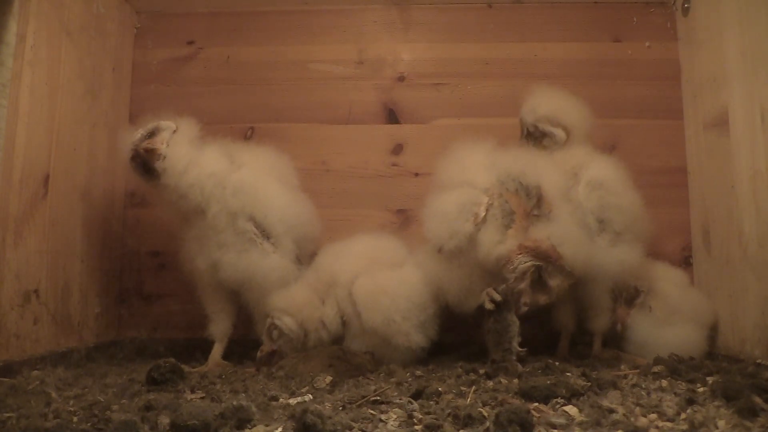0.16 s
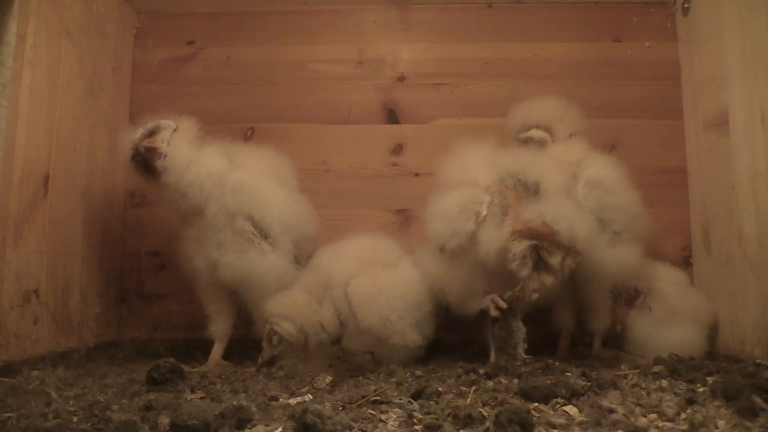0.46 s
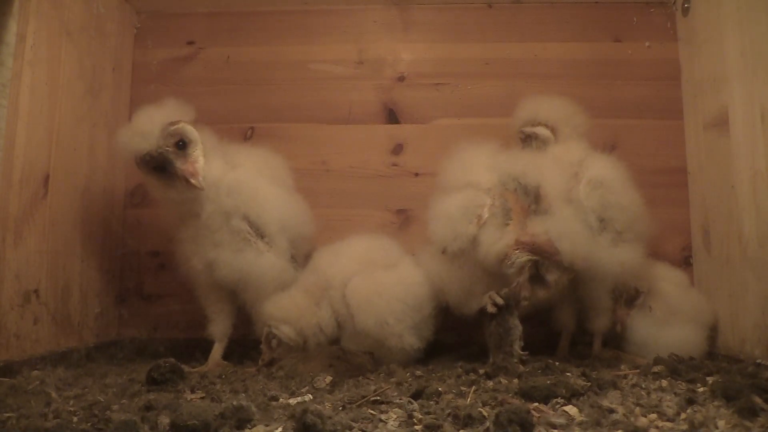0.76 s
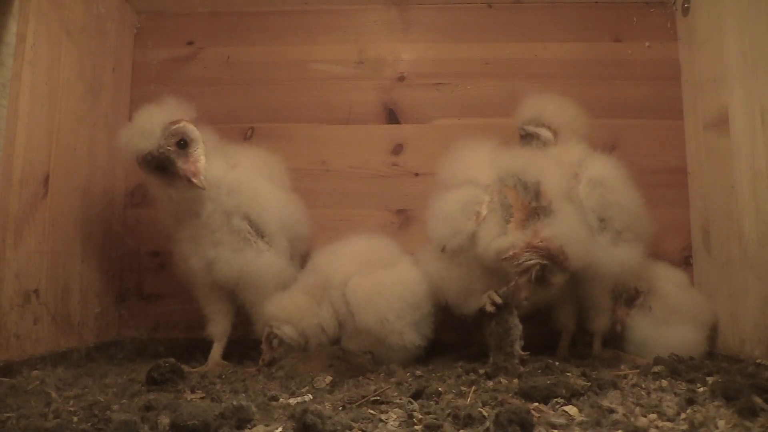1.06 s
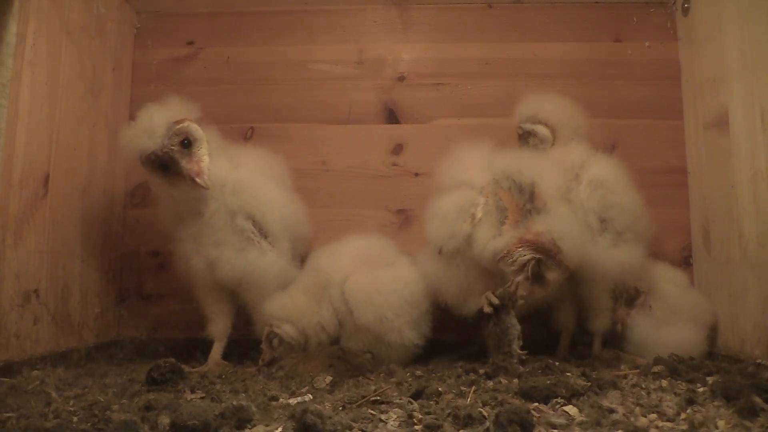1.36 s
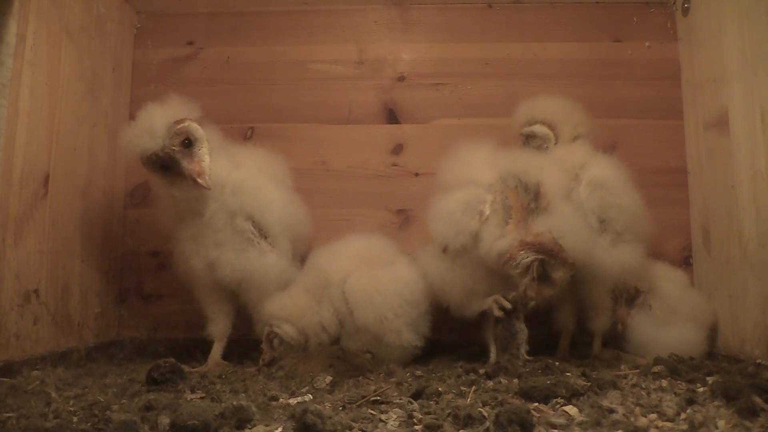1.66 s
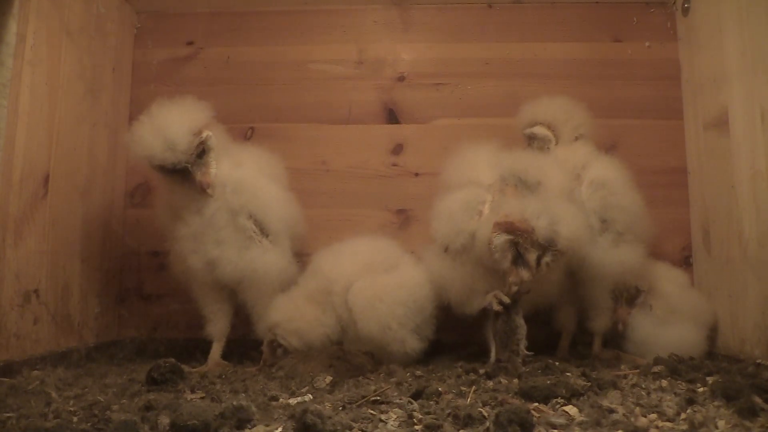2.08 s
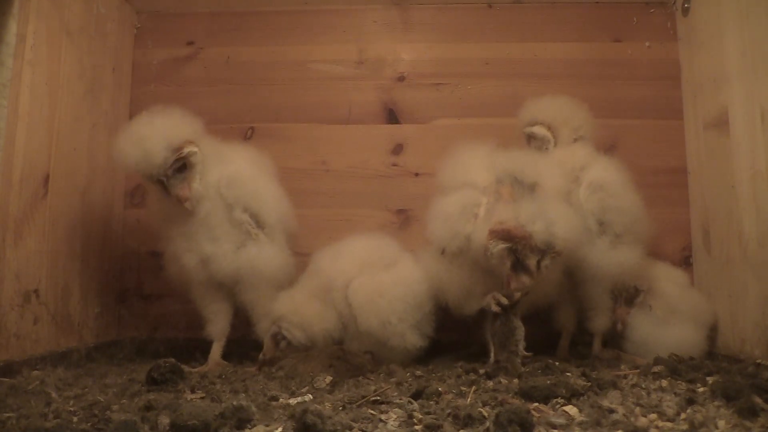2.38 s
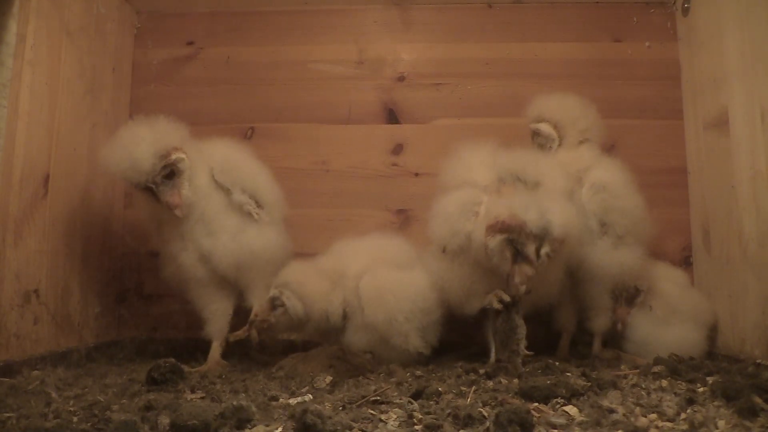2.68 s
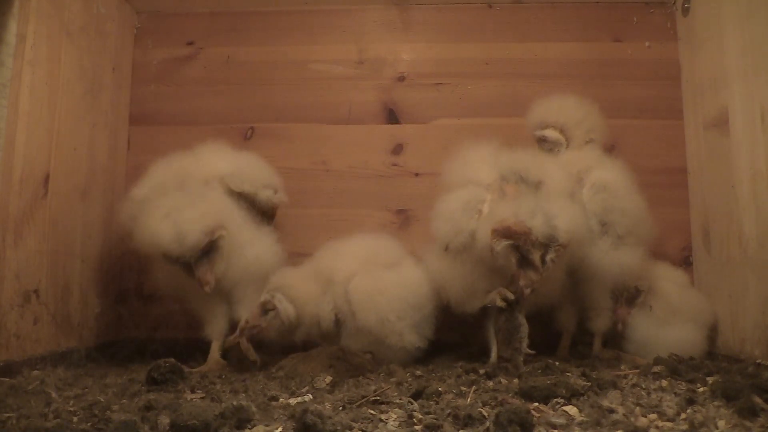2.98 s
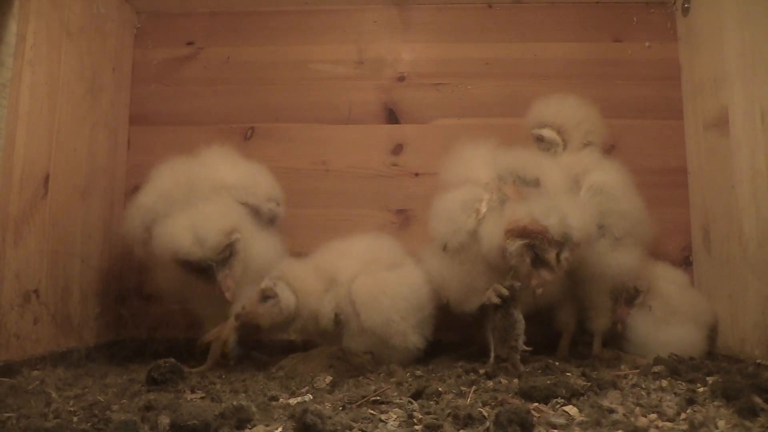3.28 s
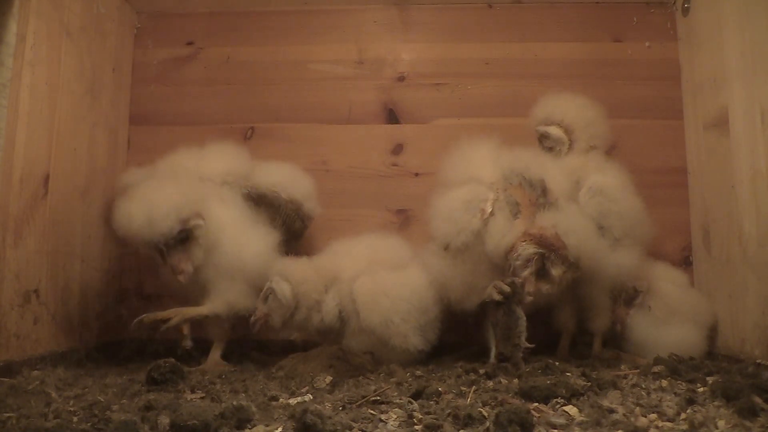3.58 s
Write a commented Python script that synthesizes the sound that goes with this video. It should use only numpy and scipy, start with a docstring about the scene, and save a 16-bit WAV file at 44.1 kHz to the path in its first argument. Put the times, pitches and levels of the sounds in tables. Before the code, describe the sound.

A young owl's harsh, raspy hiss, bright and rapidly fluttering, is under way at 0 s, shifts in tone around 0.35 s as the beak closes, and fades by 0.5 s with a tiny boxy echo. A steady, dull outdoor drone continues under thin mains buzz and faint electronic hiss. Soft, low foot thumps on boards come near 0.1, 0.35 and 0.7 s, several between 1.85 and 2.85 s, and one at 3.7 s.

```python
"""Owl chick in a nest box

An owl chick ends a raspy hiss inside a wooden nest box: chopped air drives throat and beak resonances.
A steady outdoor drone, noise shaped by the box modes, surrounds it, and feet thump the floor
boards softly as decaying low sines. Alternating mains spikes and electronic hiss join the microphone signal."""
import sys
import numpy as np
from scipy import signal
from scipy.io import wavfile
from scipy.ndimage import uniform_filter1d

SR = 44100
rng = np.random.default_rng(int(sys.argv[2]) if len(sys.argv) > 2 else 0)


def decibels_to_gain(level_db):
    """Convert a level in decibels to a linear amplitude gain (20 dB per decade)."""
    exponent = np.asarray(level_db, float) / 20
    return 10 ** exponent


def pcm_store(signal):
    """Save signal as 16-bit PCM."""
    levels = np.round(np.clip(np.atleast_2d(signal), -1, 1) * 32767)
    wavfile.write(sys.argv[1], SR, levels.astype(np.int16).T)


N = 164934  # samples
# Short-time spectra: 4096-sample windows every 1024 samples
FRAMES, BINS_HZ = N // 1024 + 5, np.fft.rfftfreq(4096, 1 / SR)


def evened(x):
    """Normalization: scales a signal to rms 1."""
    return x / np.sqrt(np.mean(x ** 2) + 1e-20)


def spectrum_at(points, hz):
    """Spectral envelope: interpolates levels in dB along a log-frequency axis."""
    point_hz, point_db = np.transpose(points)
    return np.interp(np.log(hz + 1), np.log(point_hz + 1), point_db)


def drift(count, seconds):
    """Slow random modulation: white noise through two moving averages of this length, at rms 1."""
    size = max(round(seconds * SR), 1)
    once = uniform_filter1d(rng.standard_normal(count), size)
    return evened(uniform_filter1d(once, size))


def resonate(x, hz, width):
    """Heterodyned resonance: shifts hz to zero, low-passes with one pole, shifts back, at unit peak gain."""
    carrier = np.exp(2j * np.pi * np.cumsum(hz * np.ones(len(x))) / SR)
    pole = np.exp(-np.pi * width / SR)
    return 2 * (carrier * signal.lfilter([1 - pole], [1, -pole], x / carrier)).real


def noise(shape_db):
    """Spectral shaping: weights random short-time spectra by a bins x frames field, at rms 1."""
    real, imaginary = rng.standard_normal((2,) + shape_db.shape)
    spectra = (real + 1j * imaginary) * decibels_to_gain(shape_db)
    return evened(signal.istft(spectra, nperseg=4096, noverlap=3072)[1][:N])


def chick():
    """Source-filter voice: flaps of the syrinx chop the air, and the closing beak tips its resonances."""
    # The call over time. Each row: time in seconds, then levels in dB of the low throat group,
    # the main group and the upper group.
    breath = [(0, -51, -53, -54.5), (.08, -50.5, -54, -53), (.122, -46, -48.5, -52),
              (.17, -50.5, -50.5, -50.5), (.215, -59, -44, -51), (.29, -47, -53, -51.5),
              (.35, -49.5, -45.5, -48.5), (.386, -43.5, -49.5, -48), (.40, -47.5, -49, -57),
              (.45, -57, -58, -57), (.478, -60.5, -60, -68), (.5, -74, -78, -78)]
    # Throat and beak resonances. Each row: frequency in Hz, width in Hz of each of two passes,
    # level in dB within its group with the beak open, and the same with the beak closing.
    throat = [(3130, 320, -3, -7), (3400, 200, -1, 1), (3620, 260, -5, -5), (3815, 210, 2, 1),
              (4030, 260, -3, -4), (4250, 280, -9, -9), (4940, 340, 0, -2), (6100, 300, -12, 1),
              (6480, 320, -2, -9), (7200, 240, -10, -1), (7640, 270, -1, -6), (8050, 350, -3, -9),
              (8800, 300, -3, -7), (9500, 650, -4, -6)]
    group_edges_hz = (3580, 4500)
    flutter_hz, flutter_jitter, rasp = 200, .35, .55  # jitter in log rate; rasp is modulation depth
    closing_s, closing_length_s = .345, .03  # midpoint and tanh time constant
    waver_db, waver_s, wander = 1.3, .02, .004  # each resonance swells and wanders (share of Hz) alone
    air_hz, air_db = (4440, 9700), -7  # unshaped air under the upper resonances
    echo_db, echo_t60_s = -14, .07

    t = np.arange(SR) / SR
    flap_rate = flutter_hz * np.exp(flutter_jitter * drift(count=SR, seconds=0.0036))
    flaps = np.cumsum(flap_rate) / SR
    air = rng.standard_normal(SR) * (1 + rasp * np.cos(2 * np.pi * flaps))
    shut = .5 + .5 * np.tanh((t - closing_s) / closing_length_s)

    groups = np.zeros((3, SR))
    air_band = signal.butter(6, air_hz, "band", fs=SR, output="sos")
    groups[2] = decibels_to_gain(air_db) * evened(signal.sosfilt(air_band, air))
    for hz, width, open_db, shut_db in throat:
        level = open_db + (shut_db - open_db) * shut + waver_db * drift(count=SR, seconds=waver_s)
        path = hz * (1 + wander * drift(count=SR, seconds=0.049))
        ringing = resonate(resonate(air, path, width), path, width)
        groups[np.searchsorted(group_edges_hz, hz)] += decibels_to_gain(level) * evened(ringing)

    half = SR // 2  # the call lasts half a second
    s, *levels_db = np.transpose(breath)
    call = sum(evened(group[:half]) * decibels_to_gain(np.interp(t[:half], s, db))
               for group, db in zip(groups, levels_db))
    # Decaying noise of unit energy stands for the wall reflections
    walls = rng.standard_normal(SR // 4) * decibels_to_gain(-60 * t[:SR // 4] / echo_t60_s)
    echo = signal.fftconvolve(call, walls / np.linalg.norm(walls))
    return np.pad(call, (0, N - len(call))) + decibels_to_gain(echo_db) * np.pad(echo, (0, N - len(echo)))


def drone():
    """Modal coloration: box resonances lift the noise of far traffic and air; the bass comes in gusts."""
    # Outdoor noise spectrum. Each row: frequency in Hz, relative density in dB per Hz.
    outdoor_spectrum = [(11, -35), (18, 4.5), (54, -1.5), (90, -2), (120, -8.5), (159, -7.5), (272, -16),
                        (371, -16), (500, -15), (691, -13.5), (774, -16), (999, -17), (1300, -25.5),
                        (1530, -26.5), (2200, -30), (4000, -34.5), (8000, -39.5), (15500, -43)]
    # Box resonances. Each row: frequency in Hz, width in Hz, lift at the peak in dB.
    box_modes = [(95, 25, 2), (155, 20, 3), (339, 20, 10), (400, 14, 8), (432, 30, 6), (598, 16, 4),
                 (680, 40, 3), (723, 25, 5), (908, 16, 4), (1010, 50, 4), (1237, 12, 8)]
    drone_db = -39.5  # rms
    patchy_db, gust_db, gust_top_hz = .5, .5, 120

    lift = sum(db / (1 + (2 * (BINS_HZ - hz) / width) ** 2) for hz, width, db in box_modes)
    grain = rng.standard_normal((len(BINS_HZ), FRAMES))
    patches = evened(uniform_filter1d(uniform_filter1d(grain, size=40, axis=0), size=4, axis=1))
    gusts = evened(uniform_filter1d(rng.standard_normal(FRAMES), size=4))
    bass_share = 1 / (1 + (BINS_HZ / gust_top_hz) ** 2)
    steady = (spectrum_at(outdoor_spectrum, BINS_HZ) + lift)[:, None]
    return decibels_to_gain(drone_db) * noise(steady + patchy_db * patches + gust_db * bass_share[:, None] * gusts)


def electronic_hiss():
    """Uncorrelated circuit noise: each channel has its own random draw of one fixed spectrum."""
    # Hiss spectrum. Each row: frequency in Hz, relative density in dB per Hz.
    hiss_spectrum = [(11, -1), (40, -4.5), (100, -4.5), (382, -5), (819, -11), (1200, -10), (3000, -10.5),
                     (7870, -9.5), (12000, -11.5), (15500, -14)]
    hiss_db = -53.5  # rms
    constant = np.tile(spectrum_at(hiss_spectrum, BINS_HZ)[:, None], (1, FRAMES))
    return decibels_to_gain(hiss_db) * np.array([noise(constant), noise(constant)])


def mains_spikes():
    """Mains interference: a band-limited impulse every half cycle, down and up in turn."""
    mains_hz, first_spike_s = 49.990, .00762
    skew_s, jitter_s = .000012, .000008  # upward spikes come late by the skew
    spike_db, spread_db, top_hz = -26, 1.0, 10300  # level ahead of the band limits

    k = np.arange(int(2 * mains_hz * N / SR) - 1)
    moment_s = first_spike_s + k / (2 * mains_hz) + skew_s * (k % 2)
    moment_s = moment_s + jitter_s * rng.standard_normal(len(k))
    at = moment_s * SR - 1  # one sample early, ahead of the low-pass
    size = -(-1.) ** k * decibels_to_gain(spike_db + spread_db * rng.standard_normal(len(k)))
    # Windowed sinc pulses place the spikes between samples
    near = np.round(at).astype(int)[:, None] + np.arange(-16, 17)
    off = near - at[:, None]
    out = np.zeros(N)
    out[near] = size[:, None] * .8 * np.sinc(.8 * off) * np.cos(np.pi * off / 34) ** 2
    pole = np.exp(-2 * np.pi * top_hz / SR)
    return signal.lfilter([(1 - pole) ** 2], [1, -2 * pole, pole ** 2], out)


def steps():
    """Damped vibration: soft feet push a floor board, which rings low and decays exponentially."""
    # Steps on the boards. Each row: start in seconds, envelope peak in dB, board frequency in Hz,
    # time in seconds to decay by 60 dB.
    footfalls = [(0.074, -28.5, 96.9, 0.28), (0.133, -32.5, 101.3, 0.21), (0.343, -30, 91, 0.2),
                 (0.476, -40, 61.9, 0.21), (0.73, -31.5, 92.2, 0.25), (1.852, -31, 88.4, 0.083),
                 (2.06, -33, 82, 0.11), (2.267, -34, 97.4, 0.17), (2.41, -32.5, 84.6, 0.4),
                 (2.61, -37, 87.3, 0.098), (2.831, -33, 61, 0.13), (3.713, -31, 103, 0.75)]
    rise_s = 0.014  # time constant
    t, out = np.arange(N) / SR, np.zeros(N)
    for s, db, hz, t60 in footfalls:
        age = np.maximum(t - s, 0)
        shape = (1 - np.exp(-age / rise_s)) * decibels_to_gain(-60 * age / t60)
        out += decibels_to_gain(db) * shape / shape.max() * np.sin(2 * np.pi * hz * age)
    return out


def scene():
    """Superposition: the pressures of all sources add at one microphone, fed to two channels."""
    return np.tile(chick() + drone() + steps(), (2, 1))


def roll_off(x):
    """The treble ends steeply here."""
    return signal.sosfilt(signal.butter(12, 15670, fs=SR, output="sos"), x)


def record(dry):
    """Additive interference: the cable adds equal mains spikes to both channels, and each has its own hiss."""
    mix = dry + mains_spikes() + electronic_hiss()
    return roll_off(mix)


dry = scene()
out = record(dry)
pcm_store(out)
```